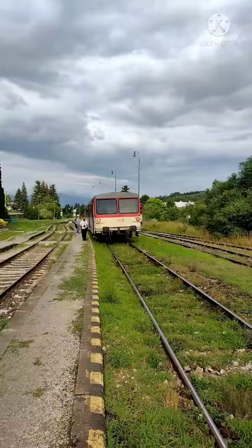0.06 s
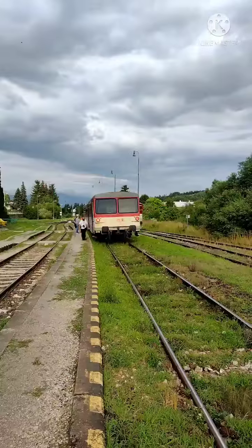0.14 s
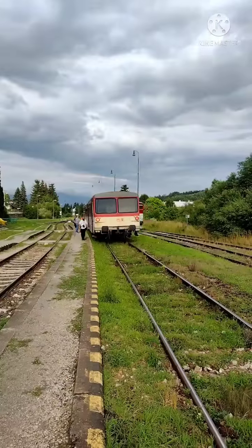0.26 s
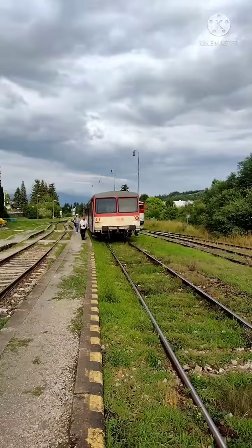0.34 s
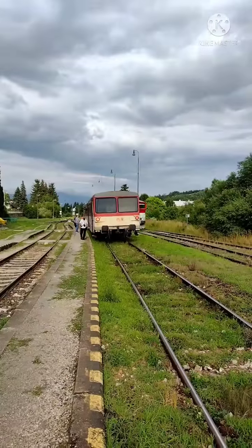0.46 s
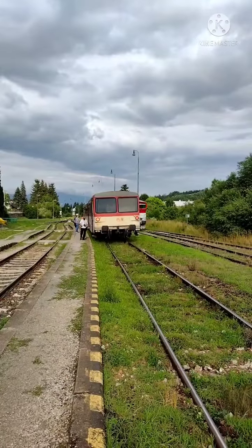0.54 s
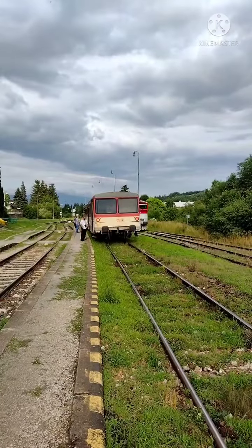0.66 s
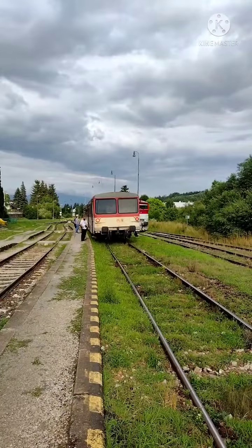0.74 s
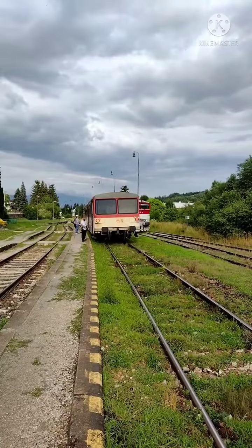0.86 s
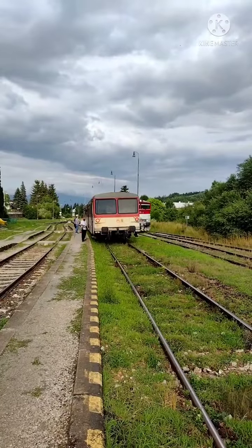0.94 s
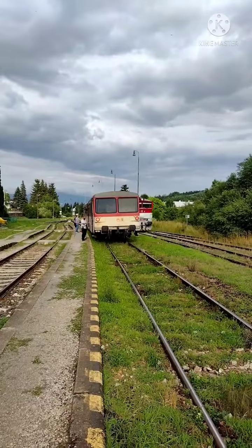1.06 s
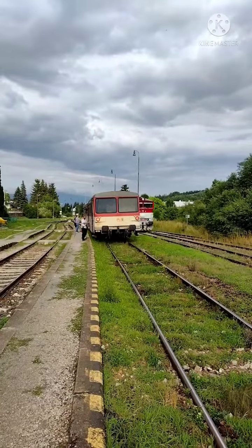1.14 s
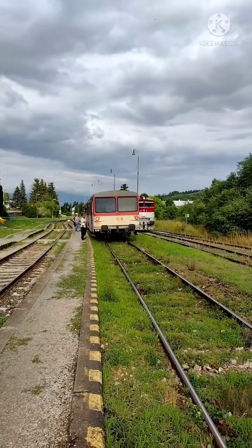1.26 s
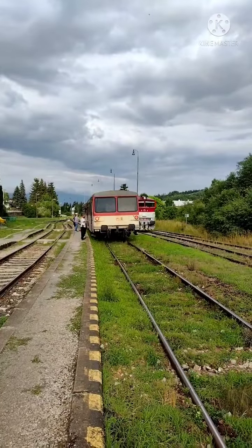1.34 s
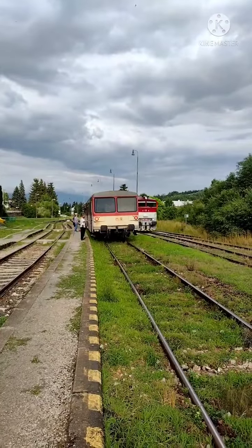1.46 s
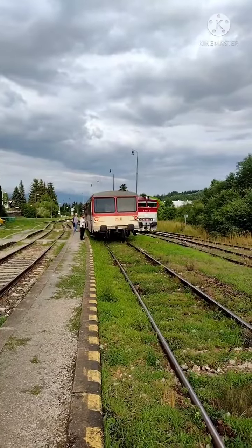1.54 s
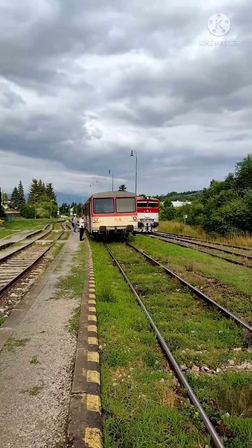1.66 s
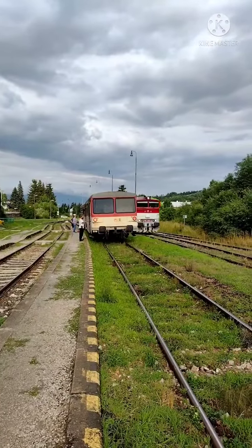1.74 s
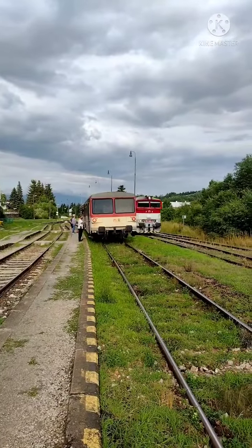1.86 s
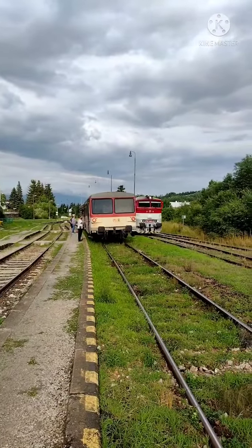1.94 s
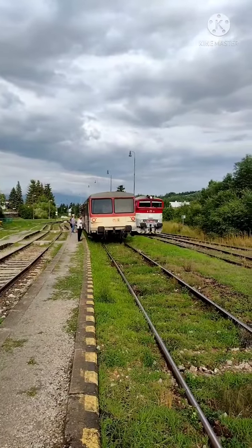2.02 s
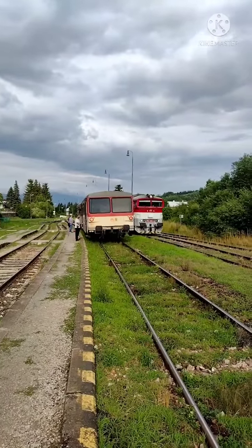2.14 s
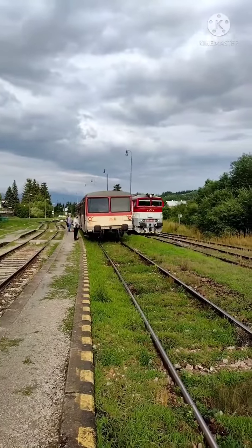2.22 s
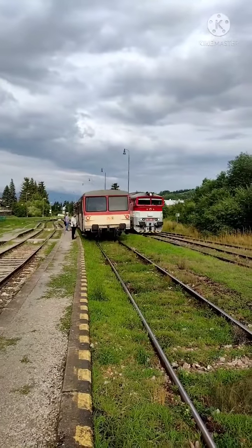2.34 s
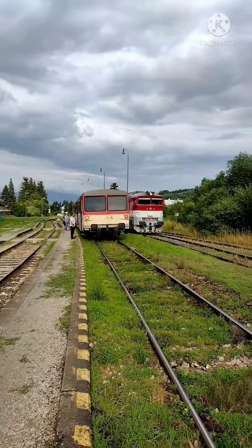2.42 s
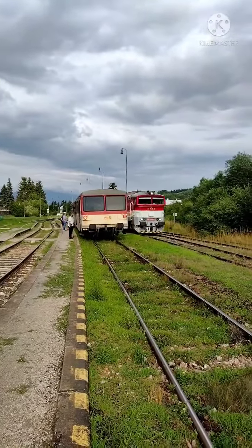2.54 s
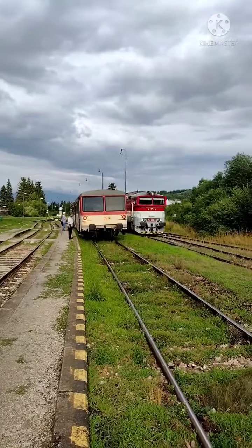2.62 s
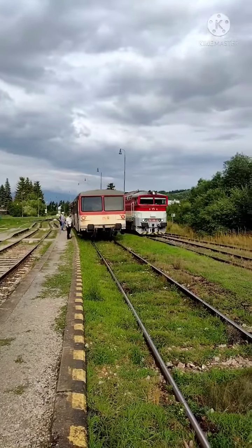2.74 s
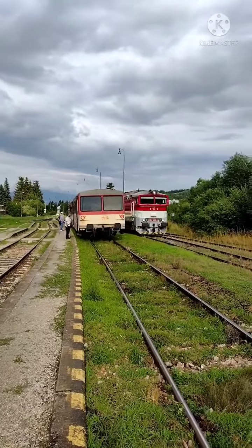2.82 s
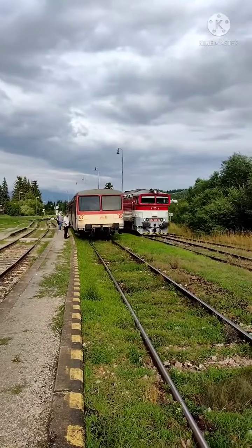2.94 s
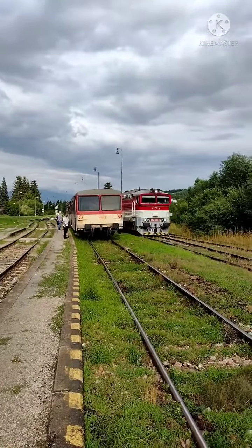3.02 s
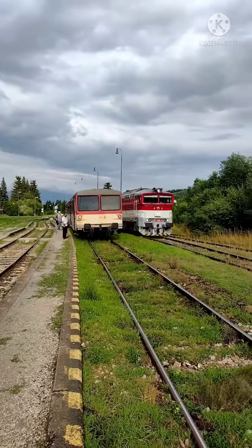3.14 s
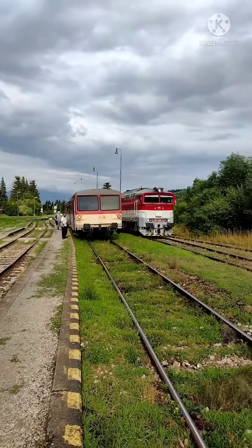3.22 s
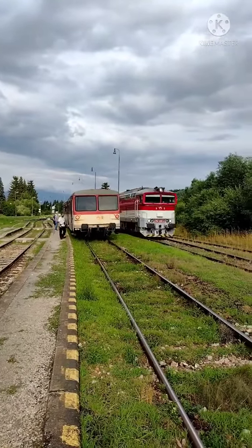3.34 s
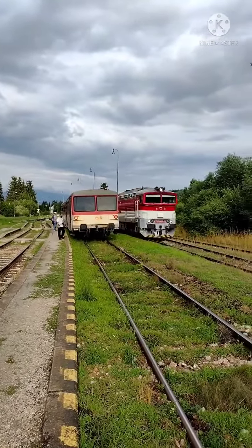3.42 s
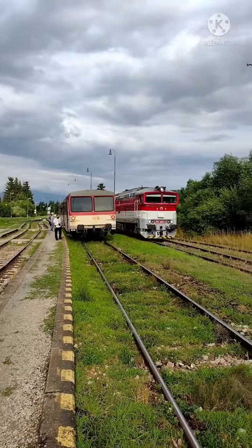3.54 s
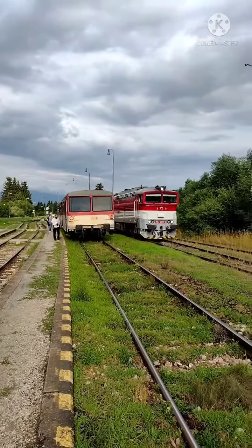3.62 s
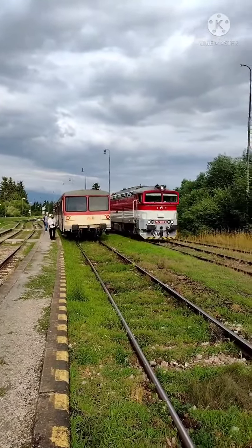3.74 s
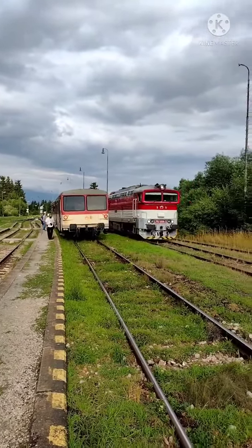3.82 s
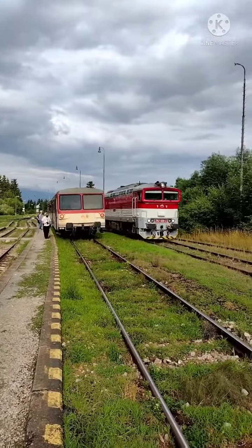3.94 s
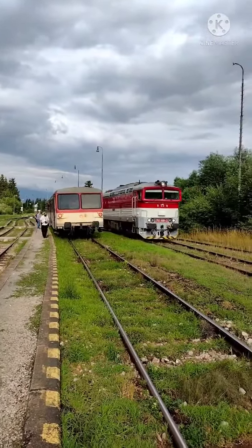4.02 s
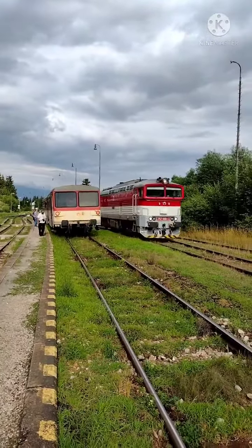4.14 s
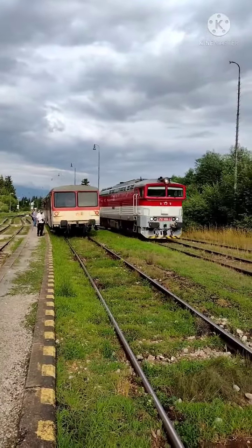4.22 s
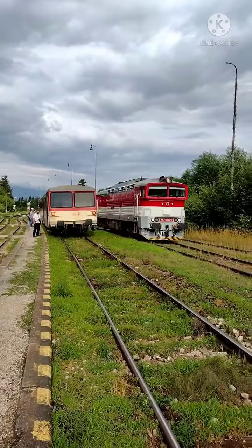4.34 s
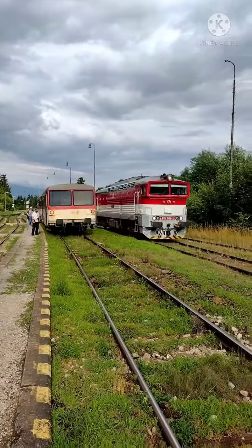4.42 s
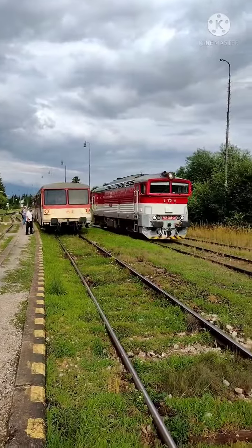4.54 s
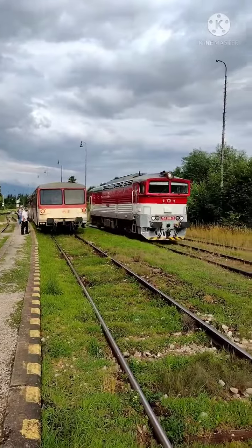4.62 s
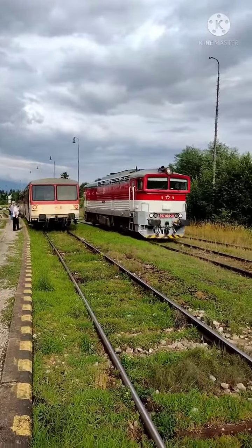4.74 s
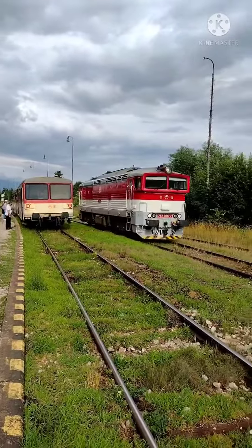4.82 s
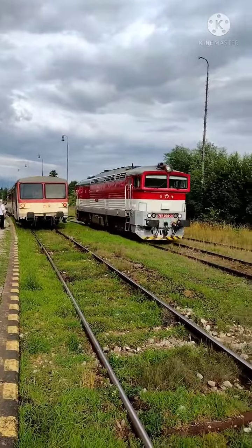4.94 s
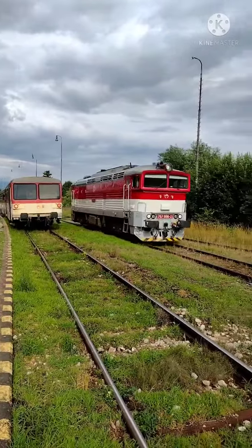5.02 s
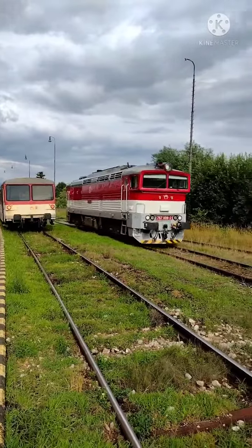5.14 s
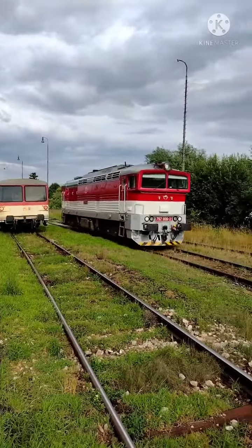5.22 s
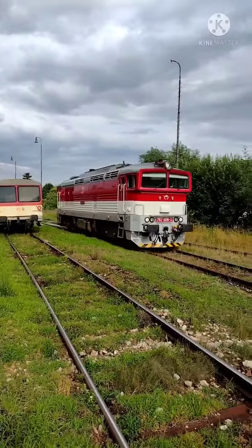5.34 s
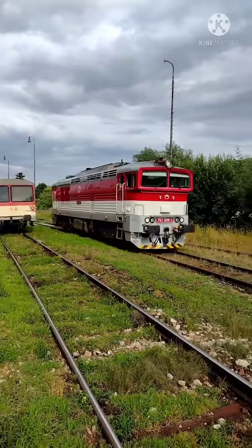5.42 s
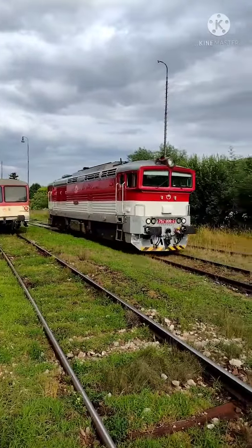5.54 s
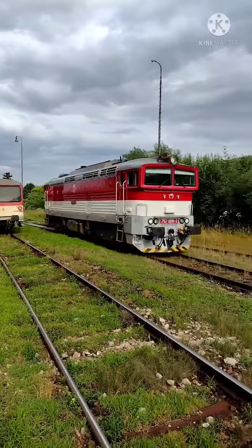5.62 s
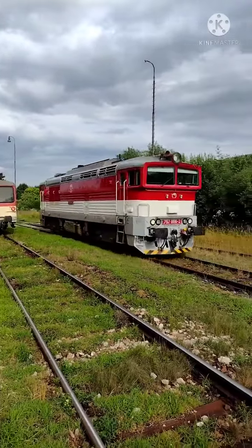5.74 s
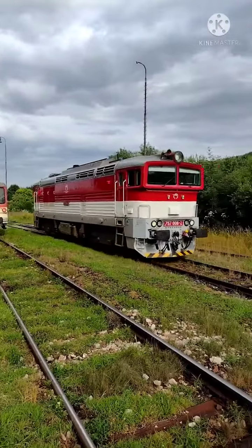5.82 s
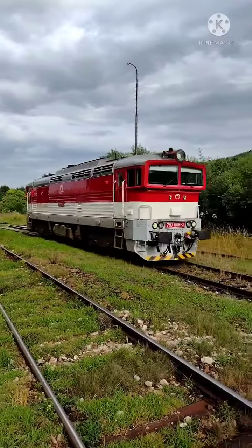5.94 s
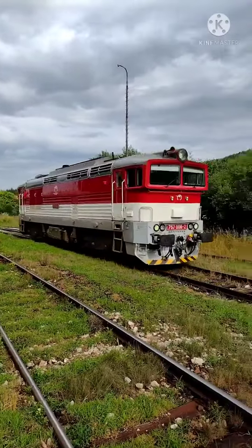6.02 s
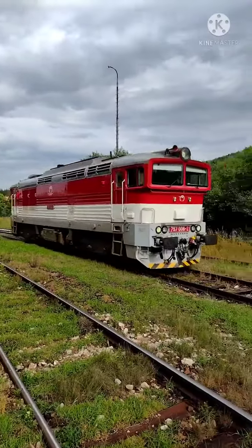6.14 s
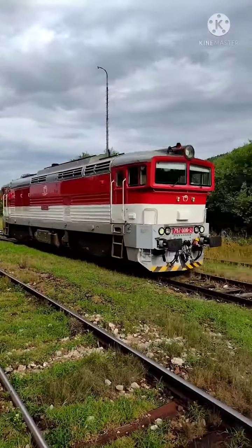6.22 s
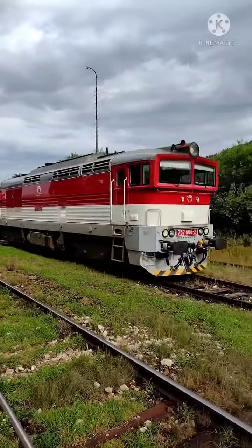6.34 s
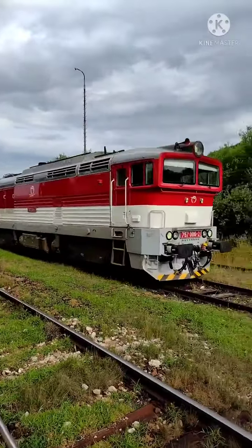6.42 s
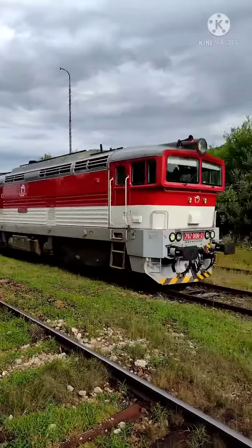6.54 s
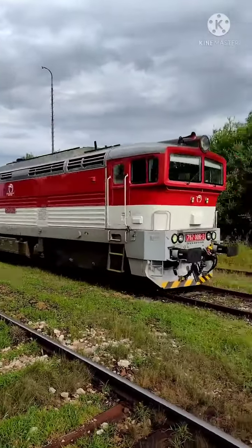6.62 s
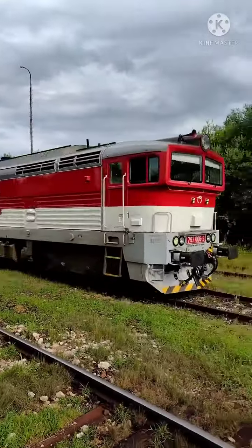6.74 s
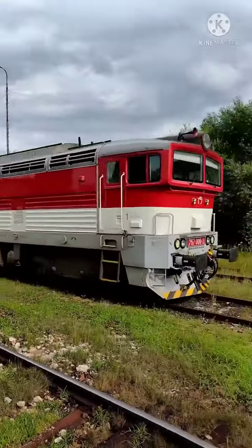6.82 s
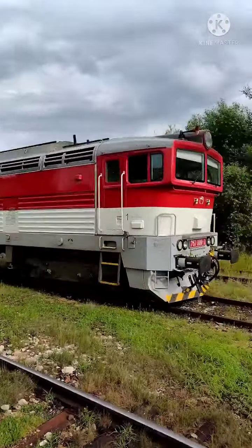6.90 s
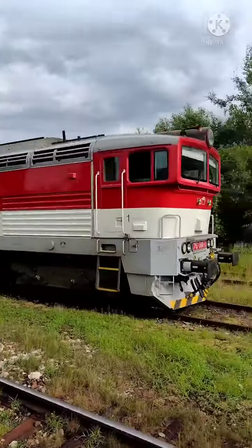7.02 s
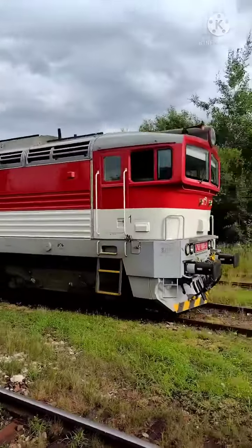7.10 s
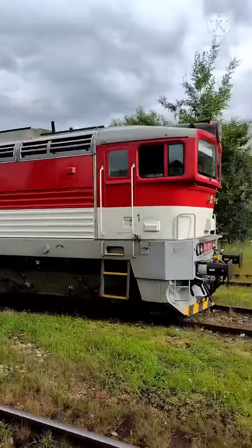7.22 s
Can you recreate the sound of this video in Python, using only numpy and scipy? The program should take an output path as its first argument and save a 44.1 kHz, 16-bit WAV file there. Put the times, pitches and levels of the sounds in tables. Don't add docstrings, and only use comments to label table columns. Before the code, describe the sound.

Open-air station platform, handheld phone in stereo. From 0 to 1.4 seconds a distant diesel hums low and softly, with one light steel click near 0.2 and faint rumble. Between 1.5 and 2.3 low wind gusts flap and thump mainly on the right, over wheel clicks at 1.4 and 1.85. At 2.75 a sharper clank with rattle and a short scrape stands out, followed by another with a dull boom at 3.2. Knocks at 3.9, 4.3 and 4.7 come nearer, the engine and rail roar rising unevenly, swelling around 5. Brief thin flange squeaks appear. From 5.8 bright cracks, rattles and heavy thuds crowd together, strongest around 6.2 to 6.9. From 6.4 the engine is loud and close, a rough throbbing drone with vibrating panels, rolling roar and clanks, drifting right and continuing until the cut at about 7.3.

```python
import sys
import numpy as np
from scipy import signal
from scipy.fft import rfft, irfft, next_fast_len
from scipy.io import wavfile
from scipy.ndimage import uniform_filter1d, map_coordinates

SR = 44100
rng = np.random.default_rng(int(sys.argv[2]) if len(sys.argv) > 2 else 0)


def dump(signal):
    limited = np.clip(np.atleast_2d(signal).T, -1, 1)
    pcm = np.round(limited * 32767).astype(np.int16)
    wavfile.write(sys.argv[1], SR, pcm)


def boost(x):
    u = np.asarray(x, float) / 20
    return 10 ** u


N = 320607
PAD = next_fast_len(N)
HZ = np.maximum(np.fft.rfftfreq(PAD, 1 / SR), 1)

# time in seconds, engine level in dB, wheel level in dB.
NEARNESS = [(0, -25.5, -25.5), (.6, -28, -26.5), (1.3, -27.5, -25), (2.0, -23.5, -22), (2.65, -24.5, -21.5),
            (3.1, -14.5, -12), (3.7, -19, -15.5), (4.15, -18.5, -18), (4.6, -13.5, -13),
            (4.95, -10.5, -6.5), (5.4, -13, -7.5), (5.7, -11.5, -4), (6.0, -12, -7.5), (6.4, -2, 2),
            (6.8, -0.5, 1), (7.27, -1.5, 1.5)]
# start in
# seconds, gear shake in dB, hold in seconds, body shake in dB.
JOINTS = [(0.252, -68, 0.054, -31.5), (0.663, -51, 0.047, -43), (0.72, -51.5, 0.042, -57),
          (1.082, -53, 0.066, -35.5), (1.425, -40.5, 0.09, -29.5), (1.831, -42.5, 0.079, -24),
          (2.74, -54, 0.049, -27), (2.778, -32.5, 0.15, -21), (3.18, -34, .015, -23.5),
          (3.211, -33, 0.065, -25.5), (3.9, -38.5, 0.023, -24), (4.286, -33.5, 0.071, -23),
          (4.686, -37, 0.018, -20.5), (4.714, -38.5, 0.059, -37), (5.133, -43, 0.031, -46),
          (5.498, -43, 0.024, -24), (5.626, -42, 0.023, -22.5), (5.718, -36.5, 0.025, -31),
          (5.781, -26, 0.014, -29), (5.86, -29.5, 0.043, -40), (6.024, -35.5, 0.098, -25),
          (6.163, -29.5, 0.063, -28), (6.35, -50, .05, -24), (6.556, -48, 0.024, -22),
          (6.644, -37, .03, -16), (6.812, -36, 0.016, -32), (7.025, -29, 0.016, -29),
          (7.126, -32, 0.019, -20), (7.23, -33, .03, -19),
          (0.473, -55.5, 0.16, -39), (1.528, -52, 0.063, -46), (1.943, -45.5, 0.097, -50),
         (2.18, -49.5, 0.097, -51), (2.368, -51.5, 0.052, -33.5), (2.581, -51, 0.037, -33),
         (3.353, -42, 0.063, -28.5), (3.488, -42.5, 0.036, -33.5), (4.072, -64, .04, -25),
         (4.22, -49, 0.058, -28), (4.375, -36.5, 0.066, -23), (5.922, -37, 0.11, -22),
         (0, -54.5, 0.15, -47), (6.113, -33, 0.074, -31), (5.332, -62, 0.12, -20)]

# time in seconds, generator hum in dB, exhaust in dB, bonnet in dB.
ENGINE_NOTES = [
    (0, 3, -8, -11),
    (2.7, -14, -5.5, -24),
    (4.6, -9, -7.5, -12),
    (5, 4, 1, -4),
    (5.4, -4, -3, -6.5),
    (5.9, -8, 0, -5),
    (6.4, -19, 1, -8),
    (6.8, 1, -6, -1),
    (7.27, 2.5, 1, 4.5),
]
# frequency in Hz, width in Hz, level in dB.
EXHAUST = [(110.4, 3, -9), (86.1, 8.3, -1), (151, 10, -2.5), (235.7, 12.7, -5.5)]
# frequency in Hz, width in Hz, level in dB.
BONNET = [(364.5, 13, 1), (320, 19, 5.5), (600, 96, -10), (280, 50, -11)]
# frequency in Hz, level in dB per Hz.
BOOM = [(30, -4), (52, -11), (65, -9), (130, 2), (240, -1.5), (290, -19), (400, -27.5), (600, -46)]
# frequency in Hz, level in dB per Hz.
RUMBLE = [(200, -32), (260, 0), (370, -0.5), (450, -13), (560, -3), (680, -5), (850, -10), (1100, -33)]

# frequency in Hz, level in dB per Hz.
ROAR = [(600, -21), (800, -5), (1100, -3.5), (1600, -2.5), (2600, -6), (3000, -13.5), (4000, -44)]
# frequency in Hz, level in dB per Hz.
RATTLE = [(2300, -18), (3100, -2), (4300, 2), (6000, -3.5), (8300, -4), (9700, -2), (12500, -12.5),
          (15400, -4)]
# frequency in Hz, width in Hz, level in dB.
WHEEL = [(6580, 62, -20.5), (9360, 40, -20), (9500, 50, -42), (10140, 54, -21), (10600, 45, -25),
         (10970, 30, -47), (11500, 37, -23), (11680, 48, -36), (12300, 40, -32), (12400, 50, -34)]
# time in seconds, level in dB.
AIR = [
    (0, -0.5),
    (2.5, 4.5),
    (4.5, 3.5),
    (6, 8),
    (7.27, 7.5),
]
# frequency in Hz, level in dB.
SHEEN = [(9000, -22.5), (11000, -6), (12500, 7.5), (15400, 0)]

# time in seconds, level in dB.
GUST = [(0, -21.5), (.25, -40), (.4, -25), (1.22, -35), (1.52, -23.5), (1.72, -26), (2.08, -21.5),
        (2.62, -28), (2.75, -62), (3.25, -36), (3.5, -30.5), (3.85, -21), (4.5, -32), (4.62, -46),
        (5.2, -20), (6.05, -22), (6.45, -21.5), (6.75, -39)]
# frequency in Hz, level in dB per Hz.
BUFFET = [(10, -28), (20, 8.5), (45, 18), (90, 12.5), (140, 5.5), (250, -40)]
# frequency in Hz, level in dB per Hz.
EDDY = [(60, -26), (130, 3), (240, -8), (350, -18.5), (450, -39), (700, -47.5)]
# time in seconds, peak in dB, push length in seconds, signed strength.
SLAPS = [(1.637, -16, 0.004, 0.67), (1.657, -9.5, 0.0036, -1), (1.68, -11.5, 0.0034, 0.94),
         (1.727, -8.5, 0.0041, -1.1), (1.783, -8.5, 0.0041, -1), (1.855, -4.5, 0.0023, -0.85),
         (1.934, -12, 0.0025, -1.46), (2.007, -8.5, 0.0044, -1.05), (2.048, -9, 0.0032, 0.85),
         (2.077, -5, 0.0024, 0.83), (2.215, -9, 0.0035, 0.72)]

# start in seconds, peak in dB, ring in Hz, time to fade by 60 dB in seconds.
CLICKS = [(0.2069, -23.5, 6500, 0.026), (1.0115, -53, 4430, 0.05), (1.4303, -34, 5400, 0.036),
          (1.8482, -23, 5010, 0.049), (2.736, -26.5, 11200, 0.069), (2.7914, -16, 9510, 0.05),
          (2.9447, -19.5, 7060, 0.027), (3.188, -29, 8750, 0.032), (3.2141, -20.5, 7720, 0.064),
          (3.918, -23.5, 9300, 0.062), (4.2936, -20, 4900, 0.049), (4.6982, -49, 4950, 0.05),
          (5.1124, -25, 12100, 0.045), (5.1677, -23.5, 4460, 0.057), (5.7918, -12.5, 6580, 0.063),
          (6.169, -11.5, 4300, 0.038), (6.1893, -9, 11300, 0.044), (6.549, -15.5, 9160, 0.038),
          (6.821, -10.5, 8350, 0.028), (7.0507, -11.5, 4450, 0.034), (7.2494, -17.5, 8300, 0.071),
          (1.8397, -36, 3670, .03), (2.7676, -25, 10200, 0.038), (3.0874, -24, 7000, .015),
          (3.113, -26, 8000, .02), (4.7197, -23, 11500, .03), (4.9856, -35, 4210, .03),
          (6.1379, -23, 11600, .03), (5.31, -40, 10100, .03), (5.48, -23, 9000, .03),
          (4.2374, -31, 10700, .03), (4.2753, -29, 9070, .03), (4.5961, -38, 9170, .03),
          (5.1588, -28, 12300, .03), (5.6492, -21, 10100, .03), (7.036, -18, 10900, .03),
          (0.281, -44, 8000, .015)]
# start in seconds, peak in dB, ring in Hz, time to fade by 60 dB in seconds.
BALLAST = [(1.434, -18.5, 151, 0.22), (2.782, -16.5, 168, 0.16), (3.189, -7.5, 138, 0.069),
           (4.292, -15.5, 131, 0.12), (4.693, -15, 145, 0.1), (5.779, -7.5, 113, 0.12),
           (6.076, -11, 347, 0.16), (6.349, -2, 200, 0.048), (4.72, -10, 194, 0.12), (6.55, -12, 75, 0.19),
           (2.83, -21, 224, 0.14), (6.343, -10, 332, .05), (6.395, -9.5, 250, 0.051),
           (6.783, -10, 220, .05), (6.855, -9, 302, 0.054), (7.032, -10, 260, .05),
           (0.265, -25.5, 70, 0.09), (0.485, -26, 160, .07), (3.9, -15, 140, .15), (3.29, -17, 115, .1),
           (6.657, -8, 380, .06), (4.5, -18, 150, .1)]
# start in seconds, length in seconds, frequency in Hz, level in dB.
WHISTLES = [(.73, 0.04, 3600, -49), (.5, 0.21, 11500, -65), (.7, 0.33, 10600, -74), (1.1, 0.17, 10600, -64),
            (2.4, 0.18, 11650, -64), (3.5, 0.17, 12500, -49), (4.7, 0.092, 11570, -41),
            (5.09, 0.075, 12500, -38), (5.14, 0.086, 12300, -36), (5.95, .1, 14000, -34.5),
            (5.586, 0.12, 6580, -47), (4.8, 0.18, 9230, -42), (7.2, 0.17, 10000, -39),
            (6.297, 0.36, 11680, -41), (6.506, 0.33, 13000, -56), (6.547, 0.24, 11000, -41),
            (6.42, 0.17, 12500, -36), (6.85, 0.17, 11680, -42), (7.08, .1, 11450, -47),
            (6.72, .06, 10900, -37), (6.2, 0.056, 10970, -29), (6.26, 0.08, 10970, -42),
            (6.18, .05, 11700, -37), (5.8, 0.043, 12400, -33), (4.75, 0.044, 11570, -39),
            (4.3, .05, 10600, -45), (4.59, .08, 10000, -55), (3.2, .1, 13000, -48)]
# start in seconds, level in dB, hold in seconds.
SCRAPES = [(2.785, -36, .03), (2.87, -39, 0.094), (3.21, -34, .05), (4.27, -42, .06), (4.365, -36, .07),
           (2.731, -43, .04), (4.70, -38, 0.061), (5.8, -39, 0.17), (6.14, -34, .05), (6.23, -35, 0.058),
           (1.43, -47, .08), (1.84, -44, 0.12)]
# frequency in Hz, level in dB per Hz.
SCRAPE_TONE = [(900, -28), (1500, -1), (2500, 2.5), (3200, -14), (7000, -10), (9300, 0), (11500, -4),
               (15000, -5.5)]
# start in seconds, peak in dB, ring in Hz, time to fade by 60 dB in seconds.
THUDS = [(1.45, -40, 750, 0.055), (2.731, -33, 814, 0.14), (2.733, -40.5, 1700, .15),
         (6.352, -17.5, 470, .06), (6.338, -32, 850, .05), (3.918, -37, 1500, .05), (4.39, -30, 1900, .08),
         (3.131, -33, 490, 0.07), (3.189, -29, 650, 0.044), (4.292, -48, 690, 0.039),
         (4.694, -41, 684, 0.06), (5.273, -26, 690, 0.098), (5.771, -21, 744, 0.062),
         (6.079, -49, 565, 0.047), (6.345, -16, 670, 0.028), (6.395, -22, 800, 0.081),
         (6.457, -21, 606, 0.047), (6.498, -18, 597, 0.063), (6.657, -11.5, 660, 0.069),
         (6.671, -11.5, 540, 0.058), (6.754, -18, 513, 0.11), (6.784, -21, 540, 0.049),
         (6.855, -11, 710, 0.053), (7.145, -16.5, 700, 0.035), (2.738, -28.5, 336, 0.71),
         (4.37, -28, 1350, 0.096), (5.978, -29, 759, .04), (6.171, -24, 820, .04), (6.202, -17, 1460, .05),
         (6.268, -32, 606, .04), (6.3, -34, 544, .04), (6.44, -20, 565, .04), (6.609, -24, 580, .04),
         (6.895, -23, 649, .04), (7.032, -21, 420, 0.055), (7.169, -16, 560, .05), (7.238, -28, 420, 0.035),
         (6.811, -25, 450, .04), (6.041, -30, 420, .04)]
# start in seconds, length in seconds, frequency in Hz, level in dB.
PANELS = [(5.97, 0.12, 243, -22.5), (6.13, 0.18, 246, -23.5), (6.31, 0.17, 243, -25), (6.5, 0.13, 243, -24),
          (6.54, 0.22, 364, -25), (6.9, 0.15, 351, -20.5), (7.1, 0.18, 361, -24), (6.68, 0.19, 390, -24.5),
          (7.16, 0.093, 320, -25), (6.98, 0.11, 335, -21), (6.55, 0.075, 290, -24.5),
          (7.18, .09, 240, -23.5)]

# time in seconds, delay in milliseconds, share from 0 to 1.
ECHO = [
    (0, 1.785, .3),
    (4.5, 1.785, .36),
    (5.5, 1.56, .36),
    (6.4, 1.54, .32),
    (7.27, 1.5, .3),
]
# frequency in Hz, level in dB.
ECHO_COLOUR = [(500, -30), (1100, -8), (1700, 0), (3000, 0), (4800, -3), (7000, -14), (12000, -25)]
# frequency in Hz, likeness from 0 to 1.
LIKENESS = [(60, 0.98), (300, 1), (500, 0.85), (700, 0.99), (1100, 0.5), (2400, 0.67), (3500, 0.36),
            (5500, 0.56), (8500, 0.11), (14000, 0.14)]
# frequency in Hz, left minus right in dB.
PORTS = [(60, 0.5), (300, -2), (480, 1.5), (750, -1.5), (1700, -4), (2500, 0), (5500, -2), (8500, -2),
         (11500, 3.5), (14000, 3.5)]
# frequency in Hz, lead of the left port in radians.
PORT_PHASE = [(200, 0.0039), (500, -0.47), (1100, -0.38), (1500, 0.76), (2700, 0.6), (3500, -0.26),
              (6300, 0.92), (8000, 0.99)]
# time in seconds, lag in samples.
LAG = [
    (0, 0.51),
    (5, 0.95),
    (7.27, 4.05),
]
# frequency in Hz, level in dB.
MICROPHONE = [(12550, 0), (12750, -8), (13300, -9), (13650, -16), (13900, -11), (14150, -3), (14450, -1),
              (14540, -9), (14640, -24), (15330, -36)]


def curves(table):
    seconds, *columns = np.transpose(table)
    return [np.interp(np.arange(N) / SR, seconds, column) for column in columns]


def across(points):
    return np.interp(np.log(HZ), np.log([p[0] for p in points]), [p[1] for p in points])


def unit(x):
    return x / np.sqrt(np.mean(x ** 2))


def shape(x, points):
    return irfft(rfft(x, PAD) * boost(across(points)), PAD)[..., :N]


def colour(x, points):
    return unit(shape(x, points))


def ring(x, hz, width):
    return signal.lfilter(*signal.iirpeak(hz, hz / width, SR), x)


def walk(rate):
    hold = int(SR / rate)
    levels = np.repeat(rng.standard_normal(N // hold + 1), hold)
    return 1.4 * uniform_filter1d(uniform_filter1d(levels, hold), hold)[:N]


def body(x, modes):
    return unit(sum(boost(db + 2.0 * walk(9)) * unit(ring(x, hz, width)) for hz, width, db in modes))


def grains(rate, spread_db):
    hit, size, sign = rng.random((3, N))
    rarity = np.minimum(-np.log(1 - size), 3)
    return (hit < rate / SR) * boost(spread_db * rarity) * np.sign(sign - .5)


def patchy(x, flicker_db):
    hz, t, cells = signal.stft(x, SR, nperseg=1024)
    band = 3 * np.log2(np.maximum(hz, 30) / 30)
    flicker = 2 * uniform_filter1d(rng.standard_normal((30, len(t))), 4)
    low = band.astype(int)
    db = flicker[low] + (band - low)[:, None] * (flicker[low + 1] - flicker[low])
    return unit(signal.istft(cells * boost(flicker_db * db), SR)[1][..., :N])


def late(x, samples):
    return map_coordinates(x, [np.arange(N) - samples], order=3, mode="nearest")


def shakes(table, column, attack, settle_db_s, tail_db, tail_db_s):
    t, power = np.arange(N) / SR, 0
    for row in table:
        first = int(row[0] * SR)
        since = t[:min(N - first, 2 * SR)]
        after = np.maximum(since - row[2], 0)
        fall = boost(-2 * settle_db_s * after) + boost(2 * (tail_db - tail_db_s * after))
        held_db = row[column] - 22 * (since - after)
        one = boost(2 * held_db) * np.minimum(since / attack, 1) ** 2 * fall
        power = power + np.pad(one, (first, N - first - len(one)))
    return power


def total_db(steady_db, shake, share_db):
    return 10 * np.log10(boost(2 * steady_db) + shake * boost(2 * share_db))


def efforts():
    engine_db, wheels_db = curves(NEARNESS)
    table = JOINTS
    gear = shakes(table, column=1, attack=0.0088, settle_db_s=146, tail_db=-10.5, tail_db_s=50)
    rail = shakes(table, column=1, attack=0.0046, settle_db_s=125, tail_db=-12.5, tail_db_s=20)
    frame = shakes(table, column=3, attack=0.02, settle_db_s=65, tail_db=-8.5, tail_db_s=12.5)
    gear, rail = (power * boost(2 * 1.5 * walk(30)) for power in (gear, rail))
    rail = rail + boost(2 * -21.5) * frame
    boom_db = total_db(-19 + 0.69 * engine_db, frame, -2.5)
    rumble_db = total_db(-22 + 1.02 * engine_db, frame, -13.5)
    rattle_db = total_db(-35 + 0.86 * wheels_db, gear, 0)
    roar_db = total_db(-32.5 + 0.83 * wheels_db, rail, -1.5)
    return boom_db, rumble_db, rattle_db, roar_db


def engine(boom_db, rumble_db):
    crank_hz, hum_hz, throb_db = 21.57, 67.8, 1.8
    hum_db, exhaust_db, bonnet_db = curves(ENGINE_NOTES)
    turns = np.cumsum(crank_hz * (1 + .01 * walk(3))) / SR
    strokes = np.diff(np.floor(turns), prepend=0)
    boom_noise, rumble_noise = rng.standard_normal((2, 2, N))
    firings = unit(strokes * boost(2.0 * rng.standard_normal(N))) + 0.75 * boom_noise
    hum_turns = np.cumsum(hum_hz * (1 + 0.0101 * walk(3.97))) / SR
    hum = boost(hum_db + 1.2 * walk(3.33)) * np.sin(2 * np.pi * hum_turns)
    deep = patchy(colour(boom_noise, BOOM), 2.7) * boost(1.1 * walk(25) + throb_db * walk(11))
    boom = [[1], [0]] * hum + boost(exhaust_db) * body(firings, EXHAUST) + deep
    shaking = patchy(colour(rumble_noise, RUMBLE), 1.95) * boost(1.0 * walk(40) + throb_db * walk(14))
    rumble = boost(bonnet_db) * body(rumble_noise, BONNET) + shaking
    return boost(boom_db - 3.0) * boom + boost(rumble_db - 4.0) * rumble


def rolling(rattle_db, roar_db):
    tremor = .6 * walk(20)
    rough = rng.standard_normal((2, N))
    ticks = signal.lfilter([1], [1, -np.exp(-1 / (.004 * SR))], np.abs(grains(300, 3.0)))
    chatter = colour(rng.standard_normal((2, N)) * (1 + .12 * unit(ticks)), RATTLE)
    air = boost(curves(AIR)[0] + 1.7 * walk(23))
    chatter = chatter + (air - 1) * shape(chatter, SHEEN)
    singing = sum(boost(db + 3 * walk(12)) * unit(ring(rough, hz, width)) for hz, width, db in WHEEL)
    roar = boost(roar_db + 0.32 * tremor) * patchy(colour(rough, ROAR), 1.15)
    return roar + boost(rattle_db) * (boost(2.46 * tremor) * chatter + singing)


def wind():
    gust_db = curves(GUST)[0] + 0.5 * walk(5.59)
    eddy_db = -36 + 0.99 * (gust_db + 27.0) - gust_db
    buffet = colour(np.array([grains(300, 1.4), grains(300, 1.0)]), BUFFET)
    eddies = colour(np.array([grains(90, 3.0), grains(90, 3.0)]), EDDY)
    left, right = buffet + boost(np.minimum(eddy_db, 0)) * eddies
    right = boost(gust_db) * right
    t = np.arange(N) / SR
    for start, db, push, sign in SLAPS:
        u = (t - start) / push
        slap = np.exp(-(u / 0.37) ** 2) - 0.28 * np.exp(-((u - .9) / 0.62) ** 2)
        right = right + sign * boost(db) * slap
    return np.array([boost(0.5 * gust_db - 23) * left + boost(-26.0) * right, right])


def blows(table, crack_hz, ring_db, rise, strike, width):
    out, t = np.zeros((2, N + SR)), np.arange(SR // 4) / SR
    noise = rng.standard_normal((len(table), 2, len(t)))
    for (start, db, hz, t60), burst in zip(table, noise):
        fade = (1 - np.exp(-t / rise)) * boost(-60 * t / max(t60, .005))
        crack = unit(ring(burst, np.sqrt(crack_hz * hz), 0.39 * crack_hz))
        sound = crack + boost(ring_db) * unit(ring(burst, hz, width * hz))
        sound[0] += strike * np.sin(2 * np.pi * hz * t) * np.exp(-t * hz / 2.45)
        first = int(start * SR)
        out[:, first:first + len(t)] += boost(db - 8.5) * fade * sound
    return out[:, :N]


def clicks():
    return blows(CLICKS, crack_hz=10700.0, ring_db=-7.5, rise=0.0011, strike=0.26, width=0.1)


def ballast_booms():
    return blows(BALLAST, crack_hz=93.0, ring_db=2, rise=0.0086, strike=6.0, width=0.05)


def sung_notes(table):
    out, rub = np.zeros((2, N + SR)), rng.standard_normal((len(table), 2, SR))
    for (start, length, hz, db), noise in zip(table, rub):
        swell = np.sin(np.pi * np.clip(np.arange(SR) / SR / length, 0, 1))
        first = int(start * SR)
        out[:, first:first + SR] += boost(db) * swell * unit(ring(noise, hz, 20.0))
    return out[:, :N]


def flange_whistles():
    return sung_notes(WHISTLES)


def scrapes():
    power = shakes(SCRAPES, column=1, attack=0.01, settle_db_s=112, tail_db=-14, tail_db_s=40)
    noise = patchy(colour(rng.standard_normal((2, N)), SCRAPE_TONE), 1.5)
    return np.sqrt(power) * boost(2.5 * walk(60)) * noise


def thuds():
    return blows(THUDS, crack_hz=720.0, ring_db=0.5, rise=0.0009, strike=6.6, width=0.039)


def panel_drones():
    return sung_notes(PANELS)


def platform(pair):
    delay_ms, share = curves(ECHO)
    echo = [late(v, delay_ms * SR / 1000) for v in shape(pair, ECHO_COLOUR)]
    return pair - share * np.array(echo)


def ports(pair):
    shared, separate = rfft(pair, PAD)
    like = np.clip(across(LIKENESS), 0, 1)
    mid = np.sqrt((1 + like) / 2) * shared
    side = np.sqrt((1 - like) / 2) * separate
    tilt = boost(across(PORTS) / 2) * np.exp(.5j * across(PORT_PHASE))
    left, right = irfft([(mid + side) * tilt, (mid - side) / tilt], PAD)[:, :N]
    return np.array([late(left, curves(LAG)[0]), right])


def scene():
    boom_db, rumble_db, rattle_db, roar_db = efforts()
    train = engine(boom_db, rumble_db) + rolling(rattle_db, roar_db)
    train = train + clicks() + ballast_booms() + flange_whistles()
    train = train + scrapes() + thuds() + panel_drones()
    return ports(platform(train)) + wind()


def top_cut(x):
    return signal.sosfilt(signal.butter(12, 15380, fs=SR, output="sos"), x)


def record(dry):
    ceiling = 1.1
    rounded = ceiling * np.tanh(dry / ceiling)
    return top_cut(shape(rounded, MICROPHONE))


dry = scene()
out = record(dry)
dump(out)
```